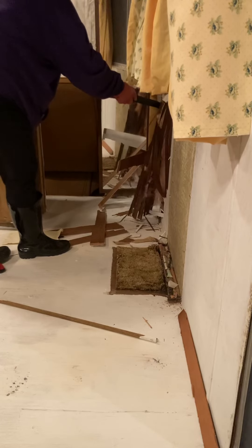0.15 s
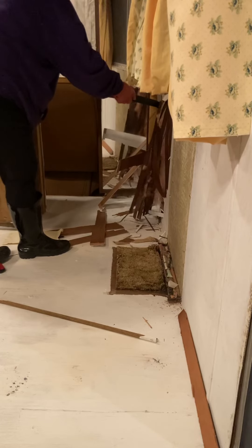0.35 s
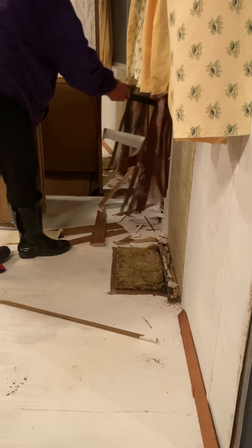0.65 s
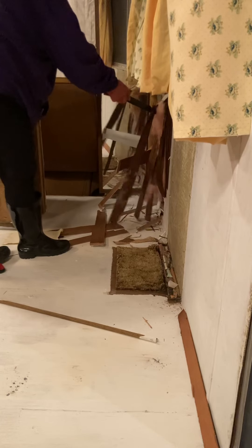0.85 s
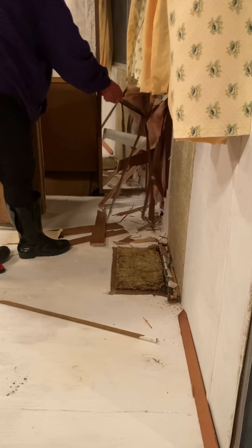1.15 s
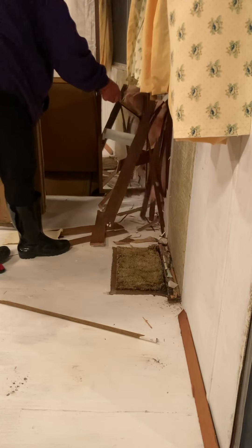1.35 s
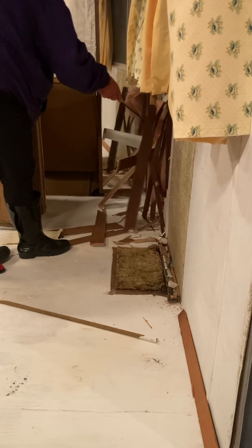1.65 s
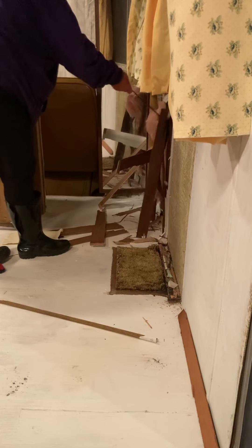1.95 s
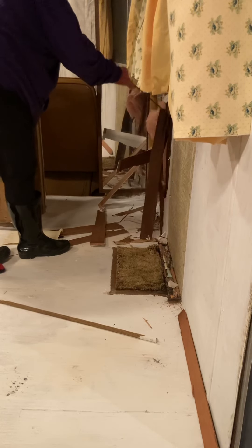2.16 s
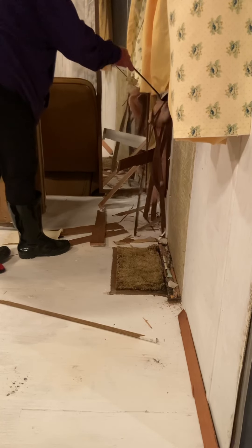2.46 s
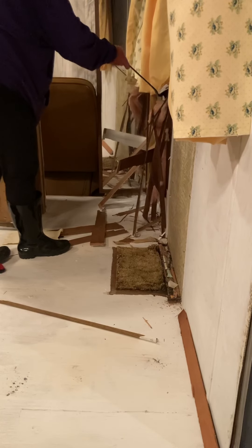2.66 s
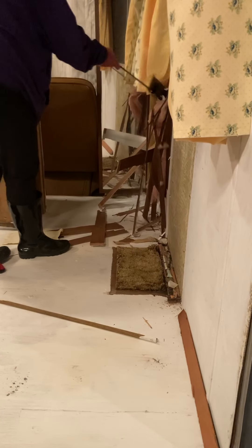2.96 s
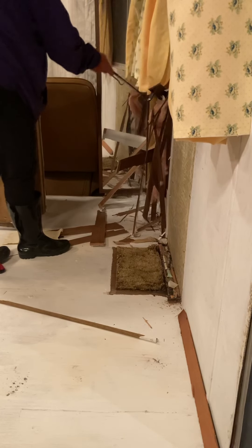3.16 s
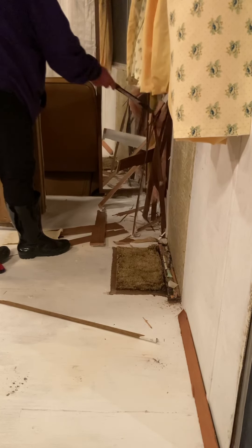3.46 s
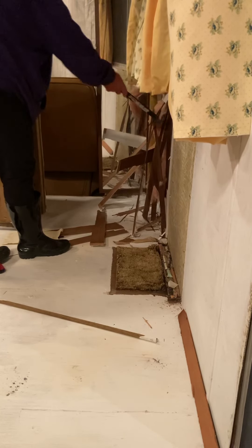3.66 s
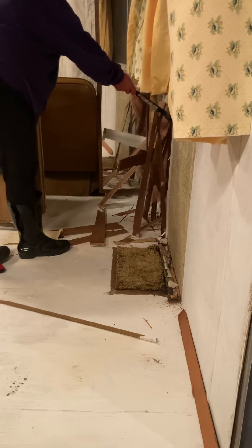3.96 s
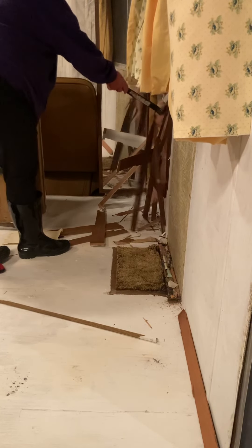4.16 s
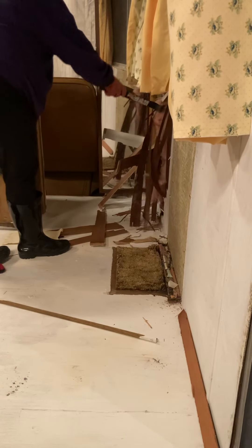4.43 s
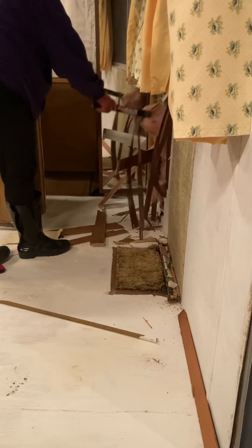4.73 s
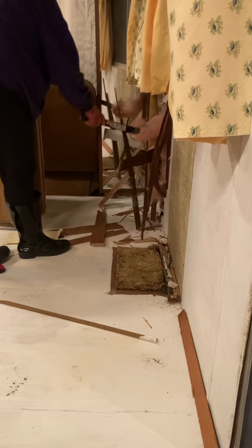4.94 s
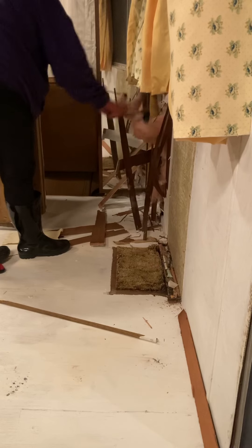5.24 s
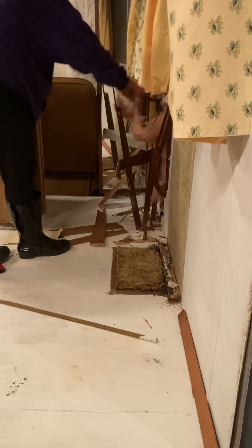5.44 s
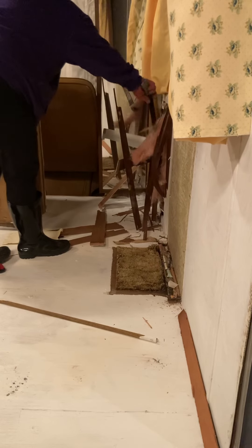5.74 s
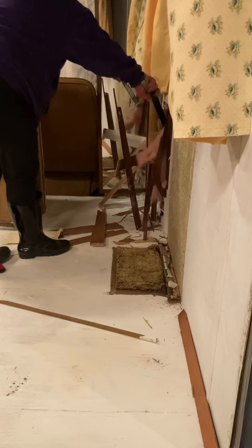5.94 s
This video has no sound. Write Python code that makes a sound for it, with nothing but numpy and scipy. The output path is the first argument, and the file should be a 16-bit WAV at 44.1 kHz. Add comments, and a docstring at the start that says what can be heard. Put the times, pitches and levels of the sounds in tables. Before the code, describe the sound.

Wooden slats crack and snap in bursts as paneling is torn from a cabin wall, with scraping and hollow knocks.

```python
"""A small hard-walled cabin: thin wall paneling is pried off and broken by hand.
Fibres give way in bursts and single ticks. Slats scrape and crackle, rattle the panel and shake the wall;
knocks ring the panel's modes. A motor hums faintly outside.
Two microphone ports a few metres away hear the cabin with different delays."""
import sys
import numpy as np
from scipy import signal
from scipy.fft import rfft, irfft, next_fast_len
from scipy.io import wavfile
from scipy.ndimage import uniform_filter1d

SR = 44100
rng = np.random.default_rng(int(sys.argv[2]) if len(sys.argv) > 2 else 0)


def output_pcm(signal):
    """Save a mono or channel-first signal as 16-bit PCM at the path in sys.argv[1].

    Samples are clipped to [-1, 1] before scaling.
    """
    pcm = np.clip(np.atleast_2d(signal).T, -1, 1) * 32767
    wavfile.write(sys.argv[1], SR, np.round(pcm).astype(np.int16))


N = 269010

# Breaking wood. Each row: start in seconds, strength in dB, slat level in dB, splinters in dB re strength.
CRACKS = [(0.0024, -19, -29, -40), (0.14, -12, -58, -7), (0.158, -12, -36, -36), (0.18, -28, -45, -13),
          (0.2548, -10.5, -37, -10), (0.301, -39, -34, -6), (0.312, -43, -44, -14), (0.473, -14, -47, -2),
          (0.516, -42, -32, -1.5), (0.565, 3, -15.5, 1), (0.59, 0, -44, -1), (0.606, -8, -18, -2),
          (0.649, -10, -29, -14), (0.752, -32, -37, -13), (0.78, -28, -61, -4), (0.8416, -30, -46.5, 4.5),
          (0.864, -43, -39.5, -10), (0.935, -27, -76, 2), (1.2173, -39, -48, -7), (1.285, -22, -40.5, -8),
          (1.2949, -27.5, -45, 9.5), (1.309, -44, -66, -3), (1.358, -23.5, -41, 2), (1.5173, -49.5, -54, 2),
          (1.547, -46, -78, 6), (1.609, -31.5, -58, 7), (1.704, -36, -51, 9.5), (1.7536, -48, -64, -8),
          (1.773, -62, -70, -19), (1.835, -42, -61, -11), (1.957, -38, -73, -3), (1.9806, -28, -77, -2),
          (2.217, -28, -66, 7), (2.2676, -33, -66, 2), (2.376, -36, -39.5, -10), (2.395, -30, -37, -2),
          (2.408, -17, -20, -4.5), (2.4485, -28, -50, -9), (2.455, -7, -27.5, -6), (2.479, -19, -37, -15),
          (2.502, -3, -24, -16.5), (2.523, -27.5, -41, -11), (2.572, -6, -28, -9.5), (2.646, -9, -35.5, 2),
          (2.686, -2, -61.5, -12), (2.695, 1, -31.5, -1), (2.7454, -40, -32, -9.5), (2.756, -8.5, -49, 6.5),
          (2.773, -8, -26.5, -5), (2.8318, -1, -18, 6), (2.838, -8, -29.5, 3), (2.91, -16.5, -33.5, 0.5),
          (3.233, -35, -69, 4), (3.304, -19, -45, 8), (3.3244, -18.5, -59, 8), (3.776, -45, -43.5, -7.5),
          (3.8193, -47, -45, -11), (3.84, -26.5, -31, -21), (3.897, -34, -69, 5), (3.94, -54, -77, -8),
          (4.044, -37, -60, -4), (4.062, -31, -61, -5), (4.2642, -28, -46, -3), (4.372, -39, -54, -4),
          (4.405, -48, -80, -13), (4.61, -40, -58, 1), (4.6954, -33, -57, -32), (4.933, -23, -63, -6),
          (5.444, -38, -47, 1), (5.468, -37, -51.5, 1), (5.5257, -30.5, -55.5, -2), (5.69, -52, -55, -4),
          (5.819, -52, -80.5, -5.5), (5.922, -54, -47, -10), (5.9895, -42, -45, -1), (6.029, -44, -38, -14),
          (6.068, -42, -57, -6), (6.079, -14, -45.5, -20)]
# Panel modes. Each row: frequency in Hz, level in dB, T60 in seconds.
PANEL_MODES = [(51, -7.5, 0.33), (63.4, -5.5, 0.15), (84.3, 4, 0.11), (100.6, 8, 0.12), (152.7, 2, 0.1),
               (182.5, 0.5, 0.086), (236.2, -5, 0.12), (274, 0, 0.09), (315.2, -5, 0.11),
               (503.5, -1.4, 0.063), (531, -5.5, 0.044), (546.7, 4, 0.046), (612, 3.5, 0.049),
               (717, -6.5, 0.12), (906, -8.5, 0.054), (1032, -10, 0.14), (1137, -6, 0.049),
               (1394, -16, 0.17), (1875, -15.5, 0.09), (2062, -26.5, 0.072)]


def gain_of(db):
    return 10 ** (np.asarray(db) / 20)


def unit_rms(x):
    return x / np.sqrt(np.mean(x ** 2) + 1e-20)


def curve_at(points, hz):
    point_hz, value = np.transpose(points)
    return np.interp(np.log(hz + 1), np.log(point_hz + 1), value)


def add(mix, start_s, sound):
    part = mix[max(round(start_s * SR), 0):][:len(sound)]
    part += sound[:len(part)]


def coloured(x, spectrum):
    """Minimum-phase filter of unit energy."""
    hz = abs(np.fft.fftfreq(4096, 1 / SR))
    log_gain = np.log(gain_of(curve_at(spectrum, hz)))
    taps = np.fft.ifft(np.exp(log_gain - 1j * signal.hilbert(log_gain).imag)).real[:2048]
    return signal.oaconvolve(x, taps / np.linalg.norm(taps))[:len(x)]


def clicks(per_s, spread_db):
    """Random clicks of either sign; a few are large."""
    hit, size, sign = rng.random((N, 3)).T
    level_db = spread_db * np.minimum(-np.log(size + 1e-9), 5)
    return unit_rms((hit < per_s / SR) * gain_of(level_db) * np.sign(sign - .5))


def crossfaded(x, paths, step_s):
    """Hands x from path to path in equal-power fades."""
    position = (np.arange(N) / SR / step_s - np.arange(paths)[:, None]) % paths - 1
    return x * np.cos(np.pi / 2 * np.clip(position, -1, 1))


def motor():
    """Motor outside: low tones that waver in level."""
    # Each row: frequency in Hz, rms level in dB.
    tones = [(156.1, -65), (231.5, -69), (306.8, -70.5)]
    t = np.arange(N) / SR
    waver_db = 2.5 * unit_rms(uniform_filter1d(rng.standard_normal((len(tones), N)), 6000, axis=1))
    return sum(gain_of(db + waver) * np.sqrt(2) * np.sin(2 * np.pi * hz * t)
               for (hz, db), waver in zip(tones, waver_db))


def still_air():
    """Faint, steady low noise of the cabin."""
    # Each row: frequency in Hz, relative density in dB.
    spectrum = [(15, -52), (25, -36.5), (48, -23.5), (102, -16.5), (123, -3), (157, 3.5), (185, -23),
                (223, -5.5), (270, -17), (309, -17), (344, -35), (394, -25.5), (1520, -58.5),
                (16000, -67.5)]
    return gain_of(-66.5) * coloured(rng.standard_normal(N), spectrum)


def fibre_sound(treble, body):
    """Two click trains, crossed over at 5 kHz and coloured as breaking fibre."""
    # Each row: frequency in Hz, relative level in dB.
    spectrum = [(300, -13.5), (800, -1.5), (1400, -2), (2100, -3.5), (3000, -6.5), (4500, -6.5), (6000, -5),
                (8500, 1), (11500, 1), (13000, -0.5), (15300, -1), (16500, -42)]
    low, high = (signal.butter(2, 5000, kind, fs=SR, output="sos") for kind in ("low", "high"))
    return coloured(signal.sosfilt(low, body) - signal.sosfilt(high, treble), spectrum)


def rubbing_levels_db():
    """Scrape, crackle and rumble over time, from the pull, the rubs and slats settling after cracks."""
    # Steady pull of the bar. Each row: time in seconds, fibre creep in dB, wall rumble in dB.
    pull = [(0, -64, -34), (.15, -84, -60), (.5, -66, -53.5), (.72, -65, -41.5), (.97, -79.5, -57),
            (1.2, -77, -54.5), (1.45, -86, -58), (1.9, -74, -54.5), (2.1, -88, -52.5), (2.4, -68, -43.5),
            (2.72, -66, -55), (2.87, -75, -40), (3.2, -78, -53), (3.429, -98.5, -52), (3.75, -93, -54),
            (3.948, -80, -50), (4.5, -85.5, -50), (4.8, -82.5, -46.5), (5.0, -66.5, -49.5),
            (5.17, -97.5, -50.5), (5.798, -91.5, -50), (6.1, -82, -51)]
    # Slat dragged on slat. Each row: peak time in seconds, scrape and crackle in dB, rise and fall in seconds.
    rubs = [(0.01, -33.5, -38.5, 0.44, 0.11), (0.2, -57, -66, 0.13, 0.055), (0.319, -45, -53, 0.11, 0.088),
            (0.648, -29, -56.5, 0.15, 0.097), (0.87, -58.5, -86, 0.47, 0.36),
            (1.53, -60.5, -86.5, 0.017, 0.63), (1.999, -50, -61, 0.09, 0.072),
            (2.283, -36, -61.5, 0.17, 0.028), (2.46, -34.5, -47.5, 0.086, 0.22),
            (2.6, -41.5, -45, 0.057, 0.041), (2.67, -46, -60, 0.046, 0.075), (2.72, -49, -53, 0.04, 0.098),
            (2.791, -41, -50, 0.12, 0.056), (2.86, -38, -46, 0.04, 0.1), (2.961, -47.5, -74, 0.052, 0.24),
            (3.249, -43, -69, 0.094, 0.041), (3.325, -45.5, -72.5, 0.094, 0.085),
            (4.055, -39, -59, 0.06, 0.32), (4.379, -58.5, -67, 0.035, 0.2), (4.46, -74, -64, 0.029, 0.094),
            (4.76, -55.5, -58.5, 0.31, 0.1), (4.828, -43, -58, 0.11, 0.095),
            (5.06, -57.5, -68.5, 0.13, 0.13), (5.2, -71.5, -77.5, 0.064, 0.034),
            (6.0, -52.5, -68.5, 0.21, 0.11)]
    range_db = 30  # covered in one rise or fall
    t = np.arange(0, N / SR + .002, .001)
    pull_s, creep_db, rumble_db = np.transpose(pull)
    power = gain_of(2 * (np.interp(t, pull_s, creep_db) + np.array([[6.5], [0]])))  # scrape, crackle
    settling = [(s + .012, slat_db - 14, db - 42, .03, .081) for s, db, slat_db, _ in CRACKS]
    for peak_s, scrape_db, crackle_db, rise_s, fall_s in rubs + settling:
        drop_db = range_db * np.maximum((peak_s - t) / rise_s, (t - peak_s) / fall_s)
        power += gain_of(2 * (np.array([[scrape_db], [crackle_db]]) - drop_db))
    levels_db = [*10 * np.log10(power), np.interp(t, pull_s, rumble_db)]
    return [np.interp(np.arange(N) / SR, t, db) for db in levels_db]


def shaken_panel(drive, low_hz, high_hz):
    """Panel modes in one band, kept ringing by small blows."""
    t = np.arange(8000) / SR
    ring = sum(gain_of(db - 60 * t / t60_s) * np.sin(2 * np.pi * hz * t)
               for hz, db, t60_s in PANEL_MODES if low_hz < hz < high_hz)
    return unit_rms(signal.oaconvolve(drive, ring)[:N])


def rubbing():
    """Bent slats crackle and scrape in clumps, rattle the panel and shake the wall."""
    clumps = gain_of(2.5 * unit_rms(uniform_filter1d(rng.standard_normal(N), 400)))
    fibres = unit_rms(clumps * (clicks(per_s=4300, spread_db=2.8) + .48 * clicks(210, .61)))
    scrape_db, crackle_db, rumble_db = rubbing_levels_db()
    friction = fibre_sound(gain_of(crackle_db + 7.5) * fibres, gain_of(scrape_db + 9) * fibres)
    rattle = shaken_panel(clicks(520, 3), low_hz=220, high_hz=3000)
    rumble = shaken_panel(clicks(360, 1.5), low_hz=58, high_hz=200)
    rattle_db = -26.5 + .53 * scrape_db
    return friction + gain_of(rattle_db) * rattle + gain_of(rumble_db) * rumble


def knocks():
    """Each blow lands elsewhere on the panel and favours the modes near one pitch; a soft blow swells."""
    # Each row: start in seconds, ring level in dB, ring pitch in Hz, low-mid and bass levels in dB,
    # softness in cycles.
    blows = [(0.002, -24, 459, -28.5, -71, 2.5), (0.164, -51.5, 670, -66, -48.5, 2.5),
             (0.258, -36, 612, -48, -57, 1.5), (0.311, -31.5, 566, -72, -46.5, 3.3),
             (0.313, -39, 1090, -72, -70, 4.1), (0.519, -24, 475, -31.5, -38.5, 4.8),
             (0.571, -5.5, 475, -23, -43, 1.24), (0.611, -10, 472, -21, -26.5, 0.84),
             (0.638, -45.5, 633, -45, -48.5, 2), (0.657, -23.5, 515, -30.5, -44, 0.67),
             (0.753, -34, 424, -59, -75, 2.6), (0.868, -48, 500, -61, -46, 0.69),
             (1.288, -28.5, 618, -42, -49, 0.96), (1.3, -30.5, 493, -43, -53, 0.99),
             (1.373, -50.5, 511, -56, -48, 0.46), (1.529, -41.5, 634, -53, -46.5, 2.2),
             (1.973, -44, 565, -64, -61, 4.2), (2.165, -34, 463, -61, -65, 1),
             (2.189, -32.5, 574, -69, -51, 1.5), (2.221, -31, 486, -73, -49, 1.7),
             (2.246, -20, 669, -35.5, -26.5, 6.4), (2.274, -17.5, 489, -37.5, -30.5, 0.89),
             (2.28, -59, 85, -42, -29.5, 0.53), (2.295, -29, 520, -29, -34, 0.3),
             (2.307, -55, 85, -66, -39.5, 0.82), (2.338, -67.5, 71, -49, -32.5, 0.71),
             (2.372, -67.5, 51, -49, -37, 1.8), (2.411, -17.5, 496, -35, -32, 2.4),
             (2.426, -19, 610, -37, -39, 1.8), (2.445, -25.5, 633, -48, -49.5, 2.8),
             (2.463, -20.5, 593, -65.5, -54, 1.5), (2.483, -22.5, 495, -40.5, -54.5, 1.6),
             (2.501, -27.5, 609, -34, -50, 0.45), (2.58, -25.5, 490, -28, -53, 2.1),
             (2.599, -29.5, 480, -38, -54, 1.2), (2.705, -27, 687, -45, -67, 0.34),
             (2.782, -30.5, 483, -34, -57.5, 0.24), (2.845, -31, 450, -25.5, -35, 1.4),
             (2.858, -28.5, 635, -29.5, -27.5, 3.1), (2.914, -24, 644, -32, -38, 2),
             (3.243, -35, 302, -37.5, -46.5, 1.8), (3.268, -33, 302, -40, -59, 1.5),
             (3.326, -27, 521, -33.5, -38.5, 1.8), (3.787, -27.5, 476, -48, -60, 4.5),
             (3.844, -29.5, 449, -43, -59, 2.9), (4.033, -13.5, 540, -54, -23, 14.2),
             (4.069, -27, 470, -57, -33.5, 3.8), (4.12, -36, 460, -44, -38, 1.3),
             (4.144, -42.5, 485, -52, -68, 1.4), (4.288, -41, 571, -54, -59, 3.2),
             (4.39, -47, 580, -66, -54, 1.7), (4.814, -25, 970, -64, -36, 4),
             (4.868, -35.5, 484, -50, -57, 1.46), (4.982, -57, 93.8, -61, -44, 1.4),
             (5.015, -65, 102, -68, -32, 4), (5.449, -32.5, 640, -32.5, -52, 2.1),
             (5.466, -40, 452, -54, -66, 1.6), (5.537, -41, 486, -48, -72.5, 3.2),
             (5.648, -63, 650, -51.5, -51, 3.2)]
    hz, mode_db, t60_s = np.transpose(PANEL_MODES)[:, :, None]
    out, t = np.zeros(N), np.arange(16000) / SR
    linger = gain_of(-41 - 60 * t / .84) * (hz > 400)  # upper modes ring on in the wall frame
    decay = gain_of(-60 * t / t60_s) + linger
    scatter = rng.random((len(blows), 3, len(PANEL_MODES), 1)) - .5
    for (start_s, ring_db, ring_hz, mid_db, bass_db, cycles), (spot, phase, detune) in zip(blows, scatter):
        spectrum = [(110, bass_db + .5), (190, mid_db + 5.5), (330, mid_db + 8.5), (450, ring_db - 6.5)]
        # Flexing shifts the modes; the nearest is set to the ring pitch.
        bent_hz = hz * np.where(hz > 200, 1 + .16 * (spot[0] + .5 * detune), 1 + .071 * detune)
        gap_hz = abs(bent_hz - ring_hz)
        bent_hz = np.where(gap_hz == gap_hz.min(), ring_hz, bent_hz)
        favour_db = 10.5 * np.exp(-(np.log(bent_hz / ring_hz) / .12) ** 2)
        level = gain_of(curve_at(spectrum, hz) + favour_db + mode_db + 4 * spot)
        swell = (1 - np.exp(-t * np.maximum(hz, 200) / max(cycles, .3))) ** 2
        modes = np.sin(2 * np.pi * (bent_hz * t + .3 * phase))
        add(out, start_s, (level * swell * decay * modes).sum(0))
    return out


def cracks():
    """Fibres give way in a quick burst; the slat's answer dies more slowly."""
    drive = clicks(per_s=7000, spread_db=2.6)
    splinters, slat = np.zeros((2, N))
    time_scale_s = .0047
    for start_s, strength_db, slat_db, splinter_db in CRACKS:
        burst = drive[round(start_s * SR):][:4000]
        burst = burst / np.std(burst[:300])
        age = np.arange(len(burst)) / SR / time_scale_s
        splinter_envelope = (1 - np.exp(-1.23 * age)) ** 2 * np.exp(-.92 * age)
        slat_envelope = (1 - np.exp(-5.2 * age)) ** 2 * np.exp(-.5 * age)
        add(splinters, start_s, gain_of(strength_db + splinter_db - 10.5) * splinter_envelope * burst)
        add(slat, start_s, gain_of(slat_db + 8.5) * slat_envelope * burst)
    return fibre_sound(splinters, slat)


def snaps():
    """A single fibre ticks, the slat jumps under it, the wall behind echoes both."""
    # Each row: time in seconds, level in dB, pitch in Hz.
    fibres = [(0.139, -23.0, 10500), (0.1832, -20.0, 8200), (0.2499, -30, 11000), (0.2575, -26.5, 11400),
              (0.2878, -28, 11500), (0.3015, -30, 10600), (0.4589, -32, 11500), (0.4761, -22.5, 10000),
              (0.5172, -21.5, 10600), (0.5229, -11.5, 11800), (0.5687, 3, 8700), (0.5924, -11, 9900),
              (0.6069, -2.5, 11100), (0.653, -9.5, 7000), (0.7549, -27.5, 7700), (0.7831, -23, 8100),
              (0.9386, -29.5, 9700), (1.364, -21, 10600), (1.6118, -24.5, 8400), (1.7574, -26.5, 9900),
              (1.7744, -32, 10100), (1.9569, -29.5, 11400), (1.986, -23.5, 8500), (2.3791, -14.5, 11600),
              (2.3976, -22.5, 10600), (2.4122, 0.0, 11200), (2.4231, -13.0, 12200), (2.45, -10.5, 8100),
              (2.4588, -7.5, 9800), (2.4661, -12.5, 9200), (2.4798, 0.5, 12500), (2.5054, -8.0, 10300),
              (2.5251, -10.5, 9000), (2.5774, -9.5, 9900), (2.6481, 1, 9600), (2.6856, -10.5, 8800),
              (2.6974, 2.5, 9200), (2.7271, -17.5, 9200), (2.7418, -12.0, 9200), (2.7611, -5.5, 10400),
              (2.7761, -9.0, 10400), (2.8358, 3.0, 10600), (2.9113, -17.0, 8600), (3.3091, -23.5, 9100),
              (3.3248, -19.0, 10000), (3.8446, -24, 6200), (3.897, -33, 11000), (3.94, -36, 9000),
              (3.949, -37, 9000), (4.0616, -10.0, 10400), (4.2699, -29.0, 8900), (4.374, -33, 9500),
              (4.4064, -31.0, 9600), (4.6124, -37.5, 9700), (4.9347, -30.5, 10500), (5.4456, -36.0, 8400),
              (5.9936, -27.0, 8800), (6.0338, -27.5, 11200), (6.0845, -28.5, 12700)]
    width_cycles, slat_hz, echo_s = .55, 2600, .0006
    out, t = np.zeros(N), np.arange(-40, 41) / SR
    jump = np.sin(2 * np.pi * slat_hz * t) * np.exp(-(slat_hz * t / width_cycles) ** 2)
    for (time_s, db, hz), (phase, late) in zip(fibres, rng.random((len(fibres), 2))):
        tick = np.cos(2 * np.pi * (hz * t + phase)) * np.exp(-(hz * t / width_cycles) ** 2)
        snap = gain_of(db) * tick + gain_of(db - 20) * jump
        add(out, time_s + t[0], snap)
        add(out, time_s + t[0] + echo_s * (.5 + late), -gain_of(-6) * snap)
    return out


def cabin_echoes(x):
    """Sparse echoes, each band dying at its own rate; patterns crossfade so no fixed pitch rings out."""
    # Each row: frequency in Hz, T60 in seconds.
    decay_times = [(100, 0.084), (500, 0.38), (2000, 0.22), (4500, 0.23), (8000, 0.13), (16000, 0.11)]
    paths, length, slot = 6, SR // 3, 20
    taps = np.zeros((paths, length))
    jitter = rng.integers(0, slot, (paths, (length - 101) // slot))
    arrivals = np.arange(100, length - slot, slot) + jitter
    np.put_along_axis(taps, arrivals, rng.choice([-1., 1.], arrivals.shape), 1)
    hz, t, bands = signal.stft(taps, SR, nperseg=128)
    decay = gain_of(-60 * t / curve_at(decay_times, hz)[:, None])
    tails = signal.istft(bands * decay, SR, nperseg=128)[1]
    tails /= np.linalg.norm(tails[0])
    return signal.fftconvolve(crossfaded(x, paths, step_s=.06), tails, axes=1)[:, :N].sum(0)


def microphone_ports(x):
    """Both ports share part of the sound, shifted in phase; the rest comes off nearby walls and differs."""
    # Each row: frequency in Hz, phase lead of the left port in radians.
    lead_rad = [(150, -.1), (350, -.35), (520, -.35), (620, -.9), (780, -2.2), (1030, -3.8), (1640, -3.6),
                (3450, -3.2), (4310, -4.4), (5080, -3.3), (6120, -2.9), (7670, -.4), (9560, .5),
                (11100, 3.0), (12500, 3.4), (13900, 6.0), (16300, 6.5)]
    # Each row: frequency in Hz, share of power common to both ports from 0 to 1.
    common_share = [(100, .995), (250, .97), (520, .88), (750, .35), (1500, .2), (3300, .2), (5200, .75),
                    (8000, .85), (15000, .9)]
    # Each row: frequency in Hz, left minus right in dB.
    balance_db = [(60, 1.5), (240, 1.5), (950, 0.0), (3770, 0.0), (15000, 0.0)]
    paths, size = 17, next_fast_len(N + 4096)
    hz = np.fft.rfftfreq(size, 1 / SR)
    walls = rng.standard_normal((2, paths, 1000)) * np.exp(-np.arange(1000) / 220)
    walls = rfft(walls / np.linalg.norm(walls, axis=2, keepdims=True), size)
    reflected = (rfft(crossfaded(x, paths, step_s=.03), size) * walls).sum(1)
    share, side = curve_at(common_share, hz), np.array([[.5], [-.5]])
    blend = np.sqrt(share) * rfft(x, size) + np.sqrt(1 - share) * reflected
    shift = np.exp(1j * side * curve_at(lead_rad, hz)) * gain_of(side * curve_at(balance_db, hz))
    return irfft(shift * blend, size)[:, :N]


def scene():
    wood, blows, ticks = cracks() + rubbing(), knocks(), snaps()
    echoes = cabin_echoes(gain_of(-6.5) * wood + gain_of(-15) * blows + gain_of(-17) * ticks)
    return microphone_ports(wood + blows + ticks + echoes + motor() + still_air())


def record(dry):
    """The microphone drops the deepest bass, rounds the peaks and limits the band."""
    low_hz, high_hz, ceiling = 42, 16650, .9
    thin = signal.sosfilt(signal.butter(4, low_hz, "high", fs=SR, output="sos"), dry)
    rounded = ceiling * np.tanh(thin / ceiling)
    band_limit = signal.firwin(511, high_hz, window=("kaiser", 9), fs=SR)
    return signal.oaconvolve(rounded, band_limit[None], "same")


dry = scene()
out = record(dry)
output_pcm(out)
```